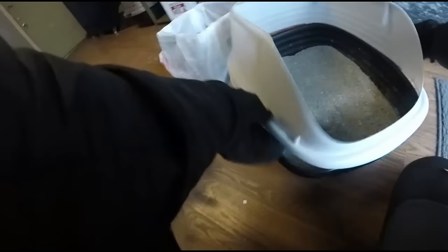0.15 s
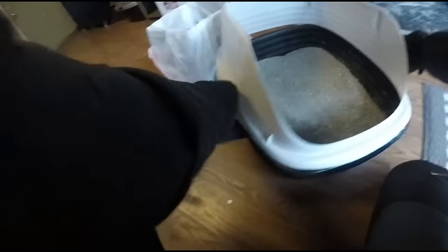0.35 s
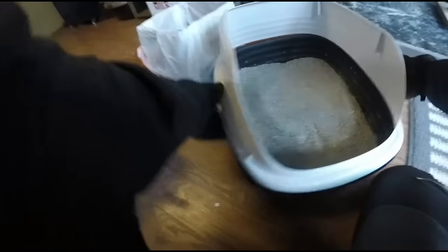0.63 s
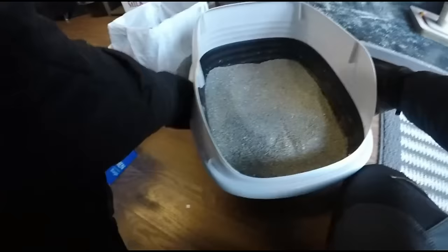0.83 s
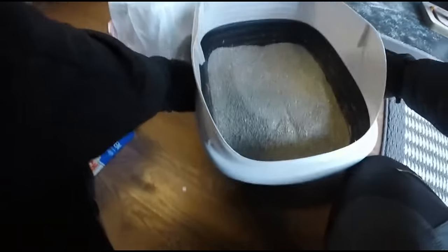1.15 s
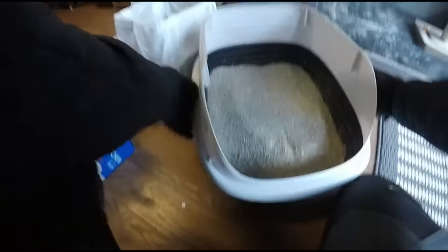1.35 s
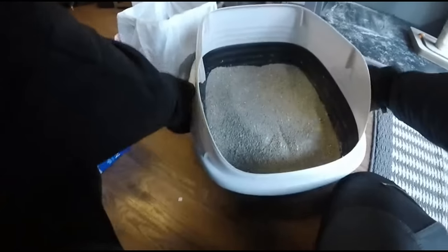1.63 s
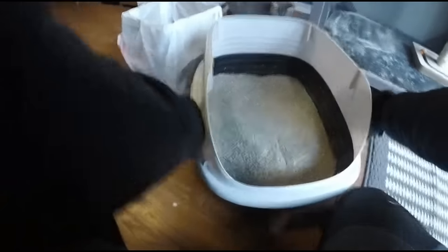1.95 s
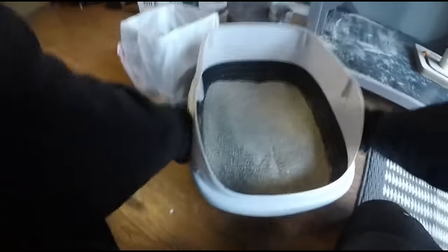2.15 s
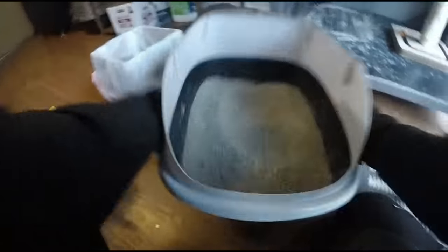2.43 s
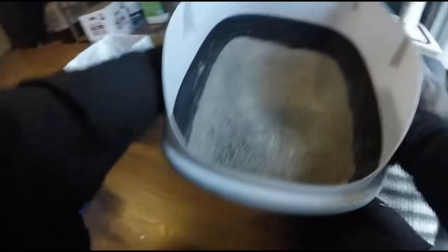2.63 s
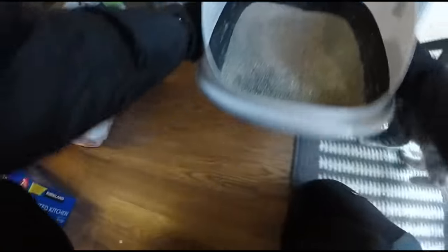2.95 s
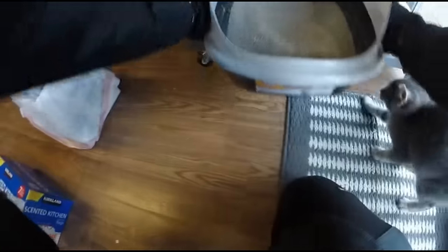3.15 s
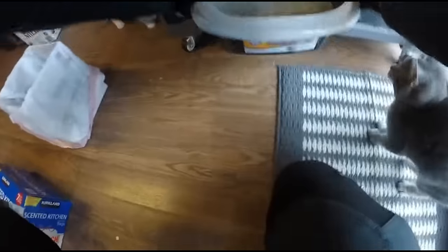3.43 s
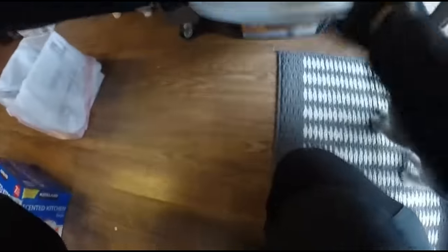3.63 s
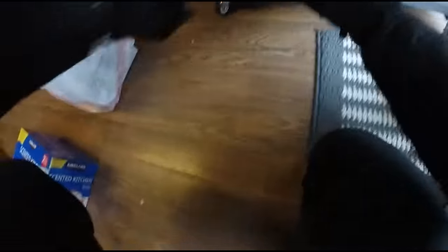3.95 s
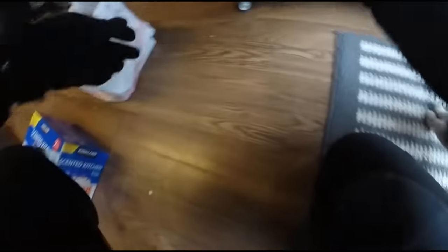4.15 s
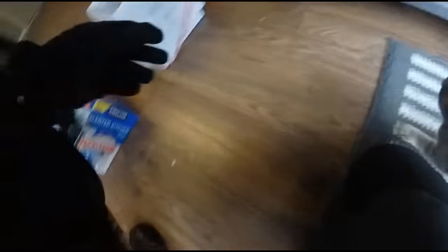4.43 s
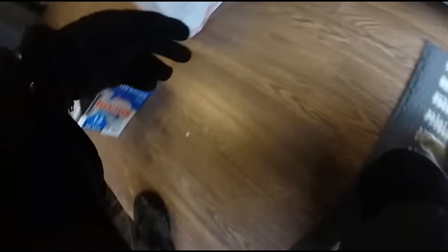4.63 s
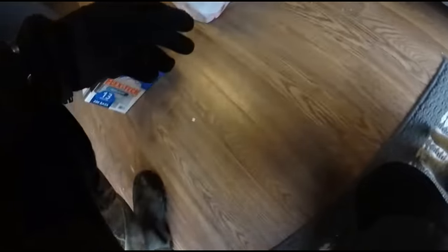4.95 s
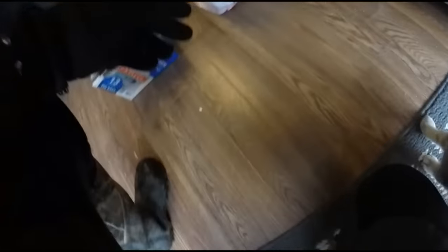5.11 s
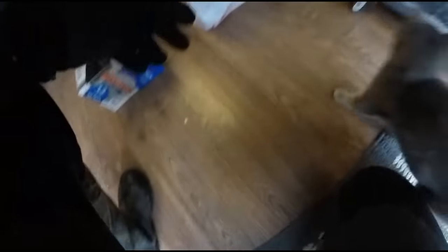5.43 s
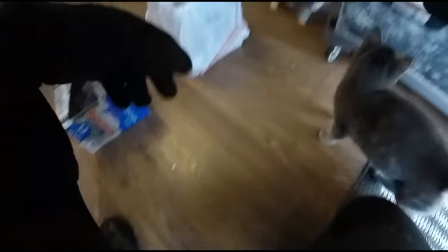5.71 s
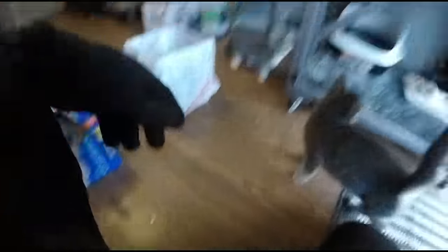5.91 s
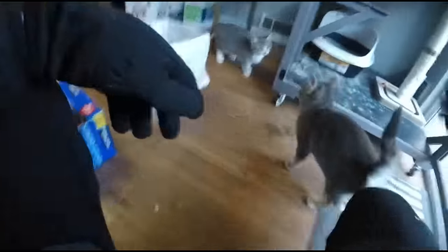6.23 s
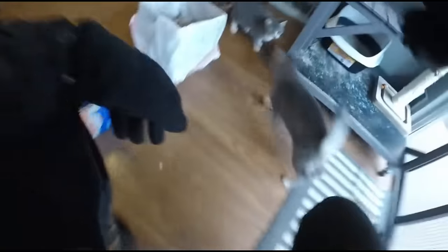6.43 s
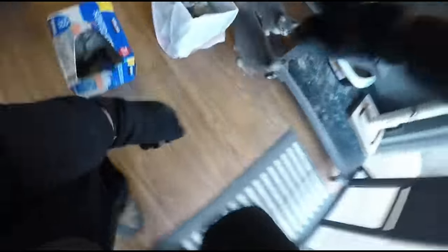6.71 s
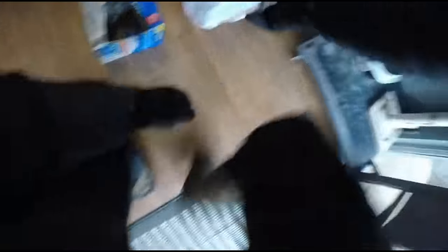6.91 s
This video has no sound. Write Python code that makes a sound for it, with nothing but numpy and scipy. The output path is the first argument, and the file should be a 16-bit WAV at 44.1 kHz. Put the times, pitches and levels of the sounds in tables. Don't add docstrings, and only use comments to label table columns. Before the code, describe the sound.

Muffled cloth rubs and bumps a body-worn microphone while a plastic litter box knocks, squeaks and groans, then loud fabric rustling as it is set down.

```python
import sys
import numpy as np
from scipy import signal
from scipy.fft import rfft, irfft, next_fast_len
from scipy.io import wavfile
from scipy.ndimage import uniform_filter1d, minimum_filter1d

SR = 44100
rng = np.random.default_rng(int(sys.argv[2]) if len(sys.argv) > 2 else 0)


def boost(x):
    u = np.asarray(x, float) / 20
    return 10 ** u


def persist_wave(psi):
    counts = np.round(np.clip(psi, -1, 1) * 32767).astype(np.int16)
    wavfile.write(sys.argv[1], SR, np.atleast_2d(counts).T)


N = 311777


def evened(x):
    return x / np.sqrt(np.mean(x ** 2) + 1e-20)


def add(mix, start_s, sound):
    part = mix[:, max(round(start_s * SR), 0):][:, :sound.shape[-1]]
    part += sound[..., :part.shape[1]]


def over_frequency(hz, values, size, *outside):
    return np.interp(np.log(np.fft.rfftfreq(size, 1 / SR) + 1), np.log(hz), values, *outside)


def colour(x, spectrum):
    size = next_fast_len(x.shape[-1] + 4096)
    hz, db = np.transpose(spectrum)
    gain = boost(over_frequency(hz, db, size, -90, -90))
    return irfft(rfft(x, size) * gain, size)[..., :x.shape[-1]]


def over_time(curve):
    time_s, db = np.transpose(curve)
    return np.interp(np.arange(N) / SR, time_s, db)


def slips(per_s, spread_db, smooth, lump_db, lump_s):
    caught = rng.random(N) < per_s / SR
    size = boost(spread_db * np.minimum(rng.exponential(1, N), 4)) * caught
    catches = evened(uniform_filter1d(size, size=24)) * rng.standard_normal((2, N))
    slow_noise = uniform_filter1d(rng.standard_normal(N), size=200)
    lumps = evened(signal.lfilter([1], [1, -np.exp(-1 / (lump_s * SR))], slow_noise))
    return (catches + smooth * rng.standard_normal((2, N))) * boost(lump_db * lumps)


def strokes(moves):
    start, top, db, share_db, easing = np.transpose(moves)
    end = np.maximum(np.append(start[1:], N / SR), top)
    times = np.transpose([top, end]).ravel()
    level = np.transpose([db, db - easing * (end - top)]).ravel()
    return np.transpose([times, level, level + np.repeat(share_db, 2)])


def played(rows, *layers):
    time_s, *levels = np.transpose(rows)
    return sum(evened(x) * boost(over_time(np.transpose([time_s, db]))) for x, db in zip(layers, levels))


# start_s, top_s, pressure_db, scrape_over_rub_db, easing_db_per_s
SQUEEZES = [(0, .004, -21.5, -0.5, 148), (.07, .1, -28, 0, 27), (.535, .634, -22, -1, 104.5),
            (.754, 1.09, -32, 2.5, 12), (1.1, 1.478, -26, -15.5, 82), (1.632, 1.66, -19, -8, 8),
            (1.73, 1.83, -30, 0, 12), (2.5, 2.79, -38.5, 6, 10), (2.808, 2.82, -17.5, -7.5, 60.5),
            (3.0, 3.11, -27.5, 9.5, -1), (3.12, 3.224, -18, -2.5, 46), (3.66, 3.68, -22.5, -1, 1),
            (3.84, 3.88, -15, -3, -5), (4.06, 4.33, -17.5, 0.5, 37), (4.34, 4.52, -17, 0.5, 50.5),
            (4.865, 4.885, -26.5, 6.5, 20), (5.2, 5.21, -25.5, 1, 55.5), (5.43, 5.69, -35.5, 1, -28),
            (5.7, 5.864, -31, 5, 31), (5.956, 6.39, -33, 1.5, 1), (6.57, 6.58, -21, -3, 31.5),
            (6.794, 7.06, -24.5, -2.5, 0)]
# time_s, level_db
CHEST_SWAY = [(0.0, -31.5), (0.53, -40), (0.63, -22.5), (0.98, -48.5), (1.4, -27.5), (1.58, -52),
              (1.68, -14), (1.91, -36), (2.11, -17), (2.34, -29.5), (3.07, -28.5), (3.15, -22),
              (3.62, -31.5), (3.72, -23.5), (4.2, -33), (4.7, -29), (6.7, -32), (7.07, -13.5)]
# frequency_hz, density_db_per_hz
HEAVE_SPECTRUM = [(8.8, -33), (15, 6), (27, -12), (54, -1), (110, -8), (140, -22), (240, -120)]
RUB_SPECTRUM = [(29, -39), (50, -22), (134, 0), (215, -2.5), (248, -2), (284, -5.5), (420, -17),
                (550, -59.5), (920, -120)]
SCRAPE_SPECTRUM = [(180, -43.5), (300, -5), (371, -5.5), (442, -5), (506, -2.5), (760, -13), (888, -23),
                   (1150, -37.5), (1500, -63.5), (2530, -120)]


def pressing():
    drive = slips(per_s=700, spread_db=3.5, smooth=1.33, lump_db=0.5, lump_s=0.022)
    heave = played(CHEST_SWAY, colour(rng.standard_normal((2, N)), HEAVE_SPECTRUM))
    rub, scrape = colour(drive, RUB_SPECTRUM), colour(drive, SCRAPE_SPECTRUM)
    return heave + played(strokes(SQUEEZES), rub, scrape)


# start_s, top_s,
# level_db, # hiss_over_rustle_db, easing_db_per_s
SLIDES = [(0, .01, -60, -18, 4), (.02, .38, -58, -6, 1), (.41, .45, -54.5, -8.5, 6),
          (.7, .8, -60.5, -10, -3), (.88, .96, -55, -10, 23), (1.3, 1.4, -59.5, -7.5, 30),
          (1.63, 1.67, -48, -14.5, 22), (1.75, 1.84, -50.5, -7, 16), (2.09, 2.105, -42, -13, 49),
          (2.24, 2.33, -50.5, -8.5, 37.5), (2.52, 2.815, -48, -7.5, 894.5),
          (2.828, 3.045, -48.5, -11.5, 132), (3.125, 3.14, -37.5, -7.5, -2), (3.15, 3.285, -37, -5.5, 354),
          (3.31, 3.345, -43.5, -5, 180), (3.386, 3.62, -51, -8, -15), (3.68, 3.73, -41, -7.5, 3),
          (3.754, 3.9, -31, -4.5, -2), (3.97, 4.13, -32, -3.5, 95), (4.2, 4.32, -30, -6, 35),
          (4.42, 4.52, -36.5, -4.5, 17), (4.73, 4.82, -59.5, -3.5, 1), (4.83, 4.986, -35, -6, 62),
          (5.206, 5.22, -55.5, -9, -33), (5.3, 5.34, -52.5, -9, -1), (5.65, 5.78, -44.5, -9, 5),
          (5.95, 6.08, -40.5, -13.5, -13), (6.14, 6.19, -48, -9, -19.5), (6.4, 6.62, -40.5, -10, 29),
          (6.72, 6.75, -42.5, -8, -3.5)]
# frequency_hz, density_db_per_hz
RUSTLE_SPECTRUM = [(530, -29), (900, 0), (1240, -1), (1700, -3), (2010, -7.5), (2180, -12), (2700, -15),
                   (3510, -20.5), (5940, -120)]
HISS_SPECTRUM = [(1290, -33), (2200, -32.5), (2860, -10.5), (3110, -4), (3500, -2.5), (3990, 1), (4620, -2),
                 (5860, 2), (6900, 0.5), (7800, 1.5), (8300, -5), (10100, -5), (13100, -20), (13900, -18.5)]
# time_s, extra_top_db
FIBRE_SHEEN = [(0, -1), (6.14, -0.5), (6.19, 7), (6.75, 4), (7.07, 1)]
# time_s, level_db
GRAIN_LEVEL = [(0, -75.5), (1.6, -88.5), (1.8, -82.5), (5.6, -80), (7.07, -72)]


def sliding():
    drive = slips(per_s=1400, spread_db=2.0, smooth=1.9, lump_db=1.4, lump_s=0.03)
    hiss = evened(colour(drive, HISS_SPECTRUM))
    top = colour(hiss, [(7000, -35.5), (9000, 0.5), (16000, 13.5)])
    hiss = hiss + top * (boost(over_time(FIBRE_SHEEN)) - 1)
    grains = colour(slips(per_s=50, spread_db=2.0, smooth=0, lump_db=2.5, lump_s=0.05), HISS_SPECTRUM)
    return played(strokes(SLIDES), colour(drive, RUSTLE_SPECTRUM), hiss) + played(GRAIN_LEVEL, grains)


# start_s, peak_db, treble_peak_db
CREASE_CRACKS = [
    (0.0044, -30, -44.5),
    (1.333, -37.5, -84),
    (1.361, -36, -69.5),
    (1.8, -50, -45),
    (2.7292, -29.5, -61.5),
    (5.1223, -42, -38),
    (7.0224, -36, -45),
    (1.909, -52, -51),
    (1.989, -53, -45),
]
# start_s, peak_db, treble_peak_db
PLASTIC_SNAPS = [(0.021, -17.5, -56), (0.1305, -20, -54.5), (0.2729, -32.5, -52.5), (0.3136, -33, -56),
                 (0.615, -19, -56), (0.6555, -33, -72), (0.668, -29, -59), (0.738, -29, -75),
                 (0.9045, -21, -57.5), (0.9435, -6.5, -33), (1.069, -31, -67), (1.1523, -33.5, -69.5),
                 (1.3877, -30.5, -57), (1.408, -36, -58), (1.659, -11.5, -45.5), (1.9084, -47.5, -55.5),
                 (2.002, -26, -64), (2.7007, -30.5, -71.5), (2.8115, -39, -64), (3.1471, -33.5, -41.5),
                 (3.4343, -43.5, -43), (5.0799, -38, -34.5), (5.2065, -33, -72), (5.805, -23, -62),
                 (6.748, -20, -58), (6.9455, -19, -37.5), (1.988, -38, -63), (3.02, -45, -48),
                 (.8985, -31.5, -52.5), (1.194, -45.5, -70), (1.275, -41.5, -73), (3.1535, -45, -45.5),
                 (3.231, -29, -44), (3.8, -39, -36.5), (3.996, -37, -29), (4.094, -38, -35.5),
                 (4.316, -36.5, -34), (5.048, -43, -37.5), (2.338, -34.5, -67), (2.52, -32, -71),
                 (3.672, -29.5, -62), (3.707, -26, -60), (0.553, -27.5, -52), (1.6365, -27.5, -52.5)]


def ticks(cracks, t60):
    out, t = np.zeros((2, N)), np.arange(4000) / SR
    for start_s, db, treble_db in cracks:
        shape = (1 - np.exp(-(t / 0.00071) ** 2)) * boost(-60 * t / t60)
        crack = rng.standard_normal((2, len(t))) * shape
        crack += 3.7 * np.exp(-((t - 0.0015) * SR) ** 2)
        low = colour(crack, [(300, -25.5), (700, 8.5), (1700, -9.0), (2400, -15), (4000, -26.0), (4800, -31.0)])
        panel_ring = np.sin(2 * np.pi * rng.uniform(1600, 1850) * t) * shape / shape.max()
        low = low / abs(low).max() + 0.15 * panel_ring
        high = colour(crack, [(2400, -21.5), (3200, -6.5), (7500, -2.5), (10000, -15.5), (16000, -27.0)])
        high = high / abs(high).max()
        add(out, start_s - 0.001, boost(db) * low + boost(treble_db + 11.5) * high)
    return out


# start_s, peak_db, ring_hz
SHELL_TAPS = [(0.022, -1.5, 380), (0.9, -21, 401), (0.943, -3.5, 613), (1.068, -15, 487), (1.152, -12, 477),
              (1.415, -17.5, 587), (1.64, -15, 417), (2.101, -19, 663), (2.115, -14, 595),
              (2.192, -16.5, 572), (2.812, -5.5, 398), (3.189, -12, 576), (3.319, -11.5, 494),
              (3.67, -13, 440), (3.707, -6, 502), (3.794, -18, 504), (3.847, -16, 514), (3.99, -16.5, 482),
              (4.385, -6.5, 498), (4.576, -15.5, 408), (4.614, -13.5, 480), (4.641, -13, 440),
              (4.862, -19, 504), (4.883, -13, 488), (4.985, -8, 520), (5.21, -2, 455), (5.282, -20, 445),
              (5.825, -22, 525), (6.584, -13, 584), (6.951, -15, 477), (6.97, -18, 622), (7.056, -9.5, 588),
              (0.591, -7, 320), (0.625, -7.5, 250), (0.742, -15.5, 522), (0.122, -11.5, 552),
              (0.13, -9.5, 519), (1.365, -21, 646), (1.654, -10, 450), (2.003, -15, 509), (3.296, -12, 471),
              (3.935, -12, 544), (4.325, -13, 554), (4.962, -12, 546), (0.9485, -1, 319), (0.008, -12, 299),
              (1.397, -9.5, 278), (1.422, -10.5, 260), (1.468, -18, 500), (1.975, -18, 320),
              (6.14, -14, 330), (6.597, -10, 298), (6.708, -12.5, 251), (7.026, -4.5, 300),
              (2.833, -10, 333)]
# start_s, peak_db, ring_hz
PADDED_SHOVES = [
    (0.016, -13.5, 344),
    (0.9, -5, 252.5),
    (0.942, -9, 293),
    (1.657, -8, 154),
    (2.98, -20.5, 133.4),
    (7.028, -8, 120),
]
# start_s, peak_db, ring_hz
WALL_RAPS = [(0.122, -5.5, 279), (0.131, -2, 330), (0.549, -13, 270), (0.559, -14, 250), (0.615, -6.5, 525),
             (0.667, -10.5, 270), (0.741, -7.5, 241), (1.151, -11, 440), (1.19, -11, 254),
             (1.274, -12, 236), (1.365, -7, 252), (1.565, -19.5, 230), (1.763, -10.5, 301),
             (1.798, -2.5, 270), (2.0, -16.5, 494), (1.66, -5.5, 473), (2.816, -0.5, 290), (4.163, -8, 460),
             (2.866, -10.5, 130), (3.674, -5.5, 250), (3.864, -4, 206), (5.6, -25, 442), (5.019, -8.5, 458),
             (4.287, -9, 533), (6.303, -16.5, 352), (5.221, -12, 442), (.198, -17, 330), (3.294, -4.5, 324),
             (0.6, -11.5, 300)]
# start_s, peak_db, ring_hz
BODY_THUDS = [(0.636, -9, 153), (1.391, -12.5, 141), (1.417, -14.5, 151.5), (1.841, -10, 131.2),
              (2.187, -13.5, 121.5), (2.406, -18, 102), (2.71, -16.5, 170), (3.381, -6.5, 145),
              (3.711, -1.5, 143.5), (5.971, -14.5, 140), (6.164, -11, 148), (6.588, -8.5, 151.4),
              (6.637, -17, 100.6), (6.973, -2.5, 200), (7.054, -13, 151.6)]


def knocks(blows, t60, rattle_db, rise):
    out, t = np.zeros((2, N)), np.arange(9000) / SR
    shell = [(80, -3.5), (200, 5.0), (450, -4.0), (750, -15), (1100, -39.0), (2000, -42.5)]
    shape = (1 - np.exp(-(t / rise) ** 2)) * boost(-60 * t / t60)
    for start_s, db, hz in blows:
        rattle = evened(colour(rng.standard_normal((2, len(t))), shell))
        ring = np.sin(2 * np.pi * hz * t) + boost(rattle_db + 5.0 - 130 * t) * rattle
        add(out, start_s - 0.002, boost(db) * ring * shape / abs(ring[0] * shape).max())
    return out


# start_s, peak_db, centre_hz
WALL_POPS = [(0.9428, -15, 2100), (0.943, -18, 3200), (0.945, -18, 1500), (0.553, -39, 2600),
             (0.617, -34, 1800), (0.739, -39, 1750), (1.651, -33.5, 2100), (1.66, -30, 1800),
             (2.8105, -29, 1550), (2.818, -36.5, 1500), (5.205, -34, 1450), (0.021, -28, 1750),
             (0.131, -32, 1750), (6.9455, -30, 1700)]


def pops():
    out, t = np.zeros((2, N)), np.arange(1500) / SR
    for start_s, db, hz in WALL_POPS:
        burst = rng.standard_normal((2, len(t))) * boost(-60 * t / 0.018)
        b, a = signal.iirpeak(hz, 2.2, SR)
        pop = signal.lfilter(b, a, signal.lfilter(b, a, burst))
        add(out, start_s, boost(db) * pop / abs(pop).max())
    return out


def wander(width_hz, length):
    r = np.exp(-np.pi * width_hz / SR)
    once = signal.lfilter([1], [1, -r], rng.standard_normal((2, SR)))
    return evened(signal.lfilter([1], [1, -r], once)[:, -length:])


# start_s, end_s, pitch_hz, width_hz, level_db
DRAG_GROANS = [(2.098, 2.16, 620, 280, -24.5), (2.15, 2.23, 510, 230, -31.5),
               (6.748, 6.754, 1760, 360, -29), (3.028, 3.064, 1350, 200, -50),
               (3.068, 3.082, 2380, 150, -58), (3.03, 3.05, 770, 90, -25), (.6, 0.63, 58, 50, -28),
               (4.874, 4.97, 710, 460, -27.5), (4.95, 5.2, 770, 95, -32.5), (3.86, 3.927, 215, 61, -13),
               (4.01, 4.36, 385, 40, -18.5), (4.44, 4.69, 250, 34, -20.5), (4.25, 4.34, 143.3, 8.5, -17),
               (4.905, 4.97, 146, 5.9, -15.5), (5.23, 5.33, 530, 120, -26.5),
               (3.074, 3.104, 1210, 150, -47.5), (3.104, 3.14, 620, 80, -26.5), (4.4, 4.6, 385, 46, -19),
               (4.6, 4.77, 350, 110, -22.5), (4.1, 4.62, 515, 60, -28.5), (4.92, 5.18, 1620, 200, -44.5),
               (4.93, 5.2, 900, 100, -36.5), (2.8095, 2.816, 1430, 570, -35.5),
               (2.817, 2.822, 1400, 500, -45), (1.33, 1.36, 1700, 140, -60), (4.05, 4.16, 140, 12, -19.5),
               (5.975, 6.015, 145, 11, -19.5), (5.83, 5.95, 510, 130, -32.5)]
# start_s, end_s, pitch_hz, width_hz, level_db
BOX_WOBBLES = [
    (1.68, 1.87, 39.4, 7.8, -22),
    (2.036, 2.39, 37.25, 1.8, -9),
    (6.58, 6.66, 42.8, 5.6, -21),
    (6.98, 7.195, 33.3, 13, -16),
]
# start_s, end_s, pitch_hz, width_hz, level_db
RIM_SQUEAKS = [
    (4.105, 4.43, 256, 10, -13),
    (2.838, 2.854, 291, 30, -10.5),
]


def groans(held, fall_db_per_s, edges, unsteady):
    out = np.zeros((2, N))
    for start_s, end_s, hz, width_hz, db in held:
        t = np.arange(0, end_s - start_s, 1 / SR)
        drift = unsteady * wander(width_hz, len(t))
        carrier = np.exp(2j * np.pi * (hz * t - 0.25))
        tone = ((1 + drift[0] + 1j * drift[1]) * carrier).real
        fade = signal.windows.tukey(len(t), edges)
        add(out, start_s, evened(tone) * boost(db - fall_db_per_s * t) * fade)
    return out


# start_s, end_s, first_hz, last_hz, level_db
RIM_SQUEALS = [
    (3.027, 3.066, 640, 690, -15.5),
    (3.073, 3.104, 649, 605, -14.5),
]


def squeals():
    out = np.zeros((2, N))
    for start_s, end_s, first_hz, last_hz, db in RIM_SQUEALS:
        t = np.arange(0, end_s - start_s, 1 / SR)
        waver = wander(85, len(t))
        glide_hz = np.linspace(first_hz, last_hz, len(t))
        phase = 2 * np.pi * np.cumsum(glide_hz) / SR + 0.48 * waver[1]
        partials_db = (0, -29, -49, -49)
        tone = sum(boost(level) * np.sin((k + 1) * phase) for k, level in enumerate(partials_db))
        swell_db = db + 2.5 + 1.7 * waver[0] + 60 * (t - t.mean())
        add(out, start_s, tone * boost(swell_db) * signal.windows.tukey(len(t), 0.15))
    return out


def scene():
    cracks = ticks(PLASTIC_SNAPS, t60=0.024) + ticks(CREASE_CRACKS, t60=0.092)
    blows = knocks(SHELL_TAPS, t60=0.034, rattle_db=-11, rise=0.0018)
    blows += knocks(PADDED_SHOVES, t60=0.11, rattle_db=-2, rise=0.0088)
    blows += knocks(WALL_RAPS, t60=0.059, rattle_db=-8.5, rise=0.0042)
    blows += knocks(BODY_THUDS, t60=0.11, rattle_db=-9, rise=0.0035)
    held = groans(DRAG_GROANS, fall_db_per_s=11, edges=0.14, unsteady=0.93)
    held += groans(BOX_WOBBLES, fall_db_per_s=59, edges=0.1, unsteady=0.24)
    held += groans(RIM_SQUEAKS, fall_db_per_s=11, edges=0.17, unsteady=0.25)
    return pressing() + sliding() + cracks + blows + pops() + held + squeals()


def roll_off(x):
    return signal.sosfilt(signal.butter(12, 14600, fs=SR, output="sos"), x)


# frequency_hz, gain_db, lead_rad, likeness_0_to_1
PORT_RESPONSE = [(60, 0.7, 0.03, 0.99), (283, -0.5, 0.27, 0.99), (499, -4.5, 0.74, 0.98),
                 (690, -15, -1.7, 0.9), (800, -25.5, 0.5, 0.7), (850, -12, 2.5, 0), (1140, -5, 2, 0.92),
                 (1830, 0, 1.26, 0.96), (2260, 1, 2, 0.3), (2760, 0, -2, 0.6), (3300, -3.5, 1.16, 1),
                 (4300, 0, 0.5, 1), (4800, -6, 0.5, 0.3), (6900, 0, 1, 0.4), (10000, 6.5, 1.5, 0.3)]


def record(dry):
    size = next_fast_len(N + 8192)
    hz, *columns = np.transpose(PORT_RESPONSE)
    db, lead, likeness = (over_frequency(hz, column, size) for column in columns)
    same = np.clip(likeness, 0, 1)
    apart = np.sqrt(1 - same ** 2)
    port = boost(db) * np.exp(1j * lead)
    shared, own = rfft(dry, size)
    left = port * (same * shared + apart * own)
    both = 2 / np.sqrt(abs(1 + port * same) ** 2 + abs(port * apart) ** 2)
    x = irfft(both * np.array([left, shared]), size)[:, :N]
    room = np.minimum(0.95 / (abs(x).max(0) + 1e-9), 1)
    limiter_gain = uniform_filter1d(minimum_filter1d(room, size=601), size=300)
    return roll_off(x * limiter_gain)


dry = scene()
out = record(dry)
persist_wave(out)
```